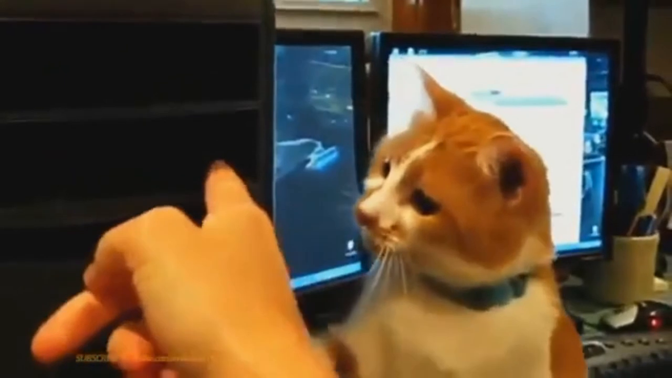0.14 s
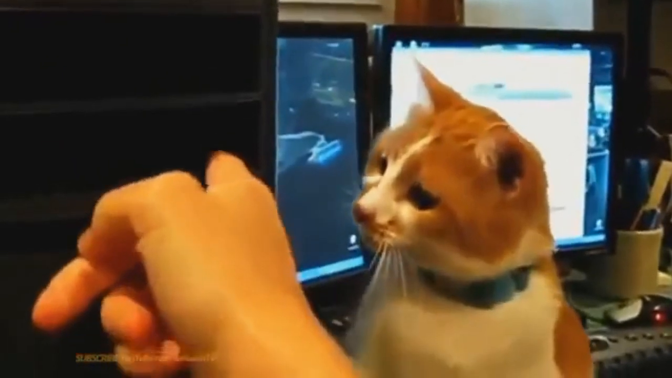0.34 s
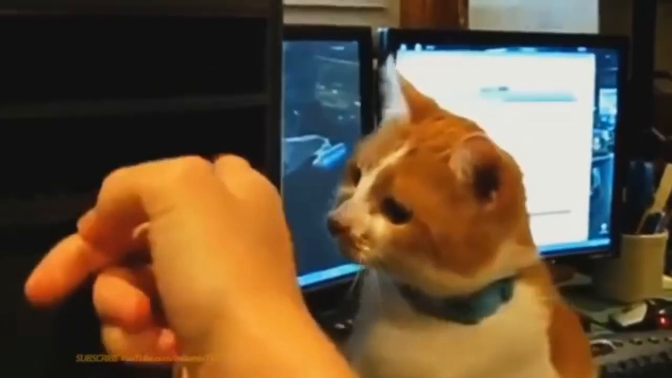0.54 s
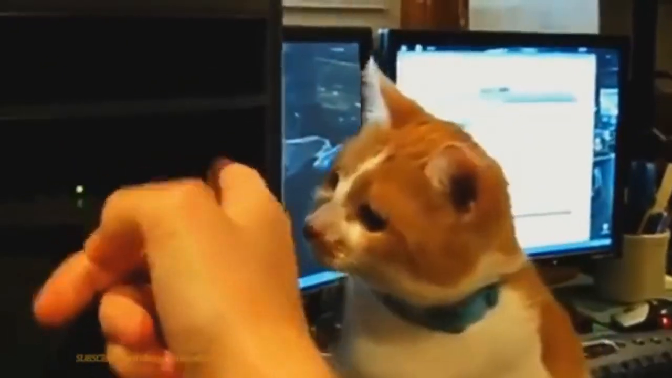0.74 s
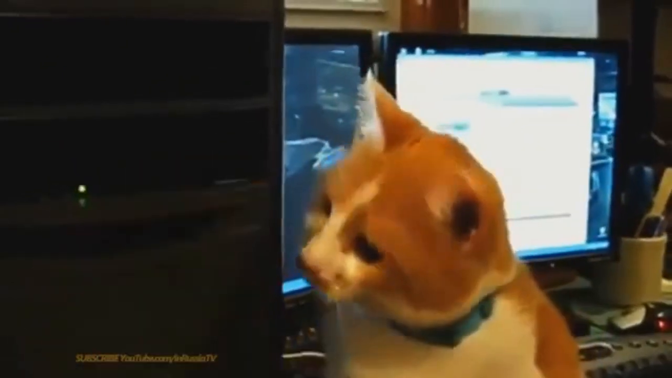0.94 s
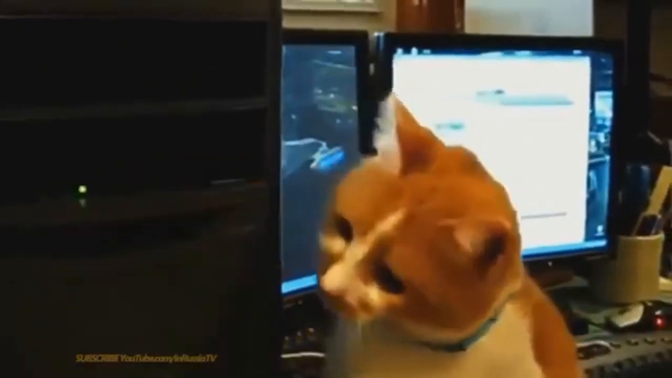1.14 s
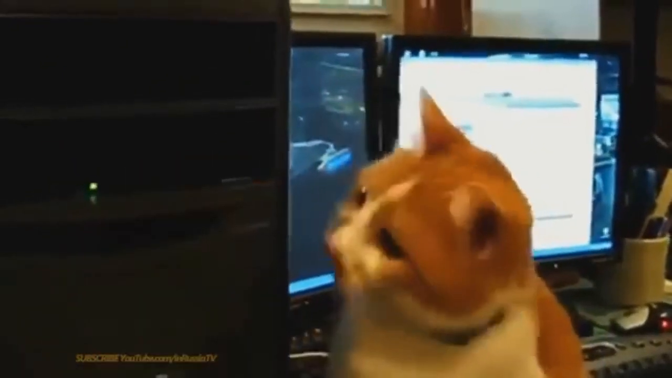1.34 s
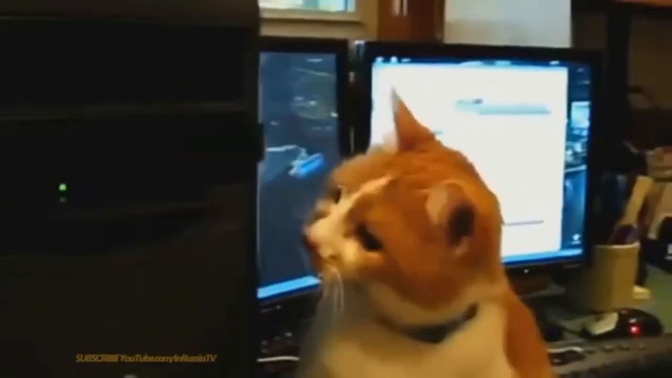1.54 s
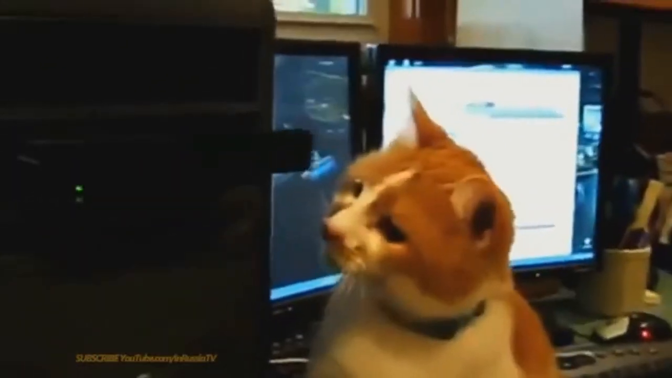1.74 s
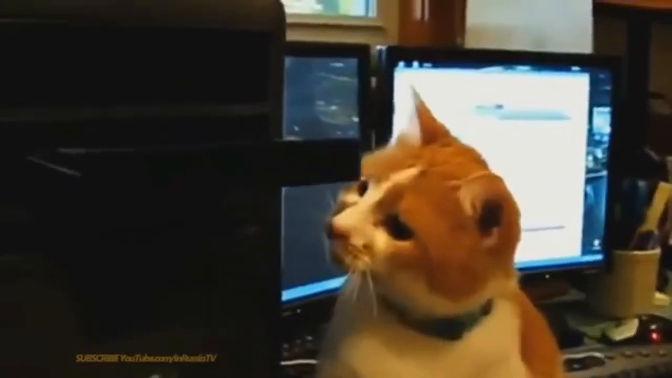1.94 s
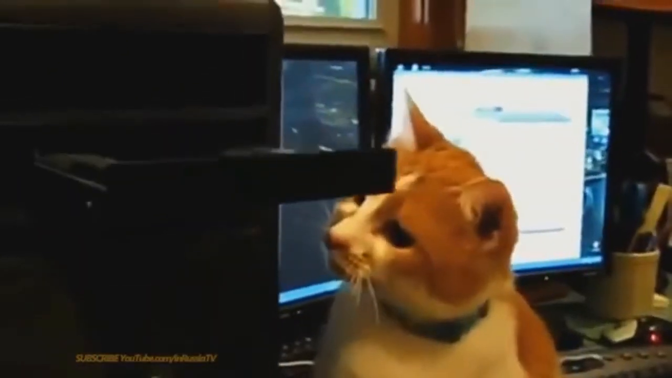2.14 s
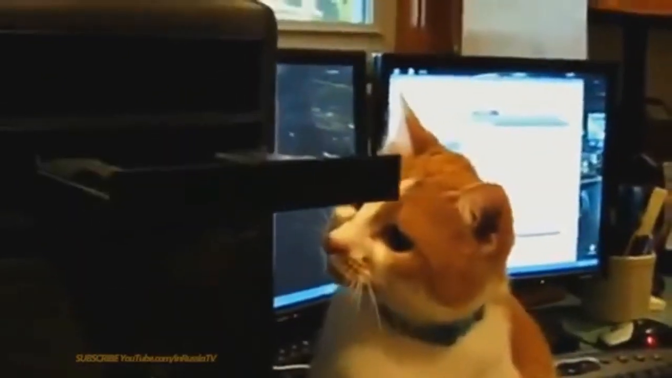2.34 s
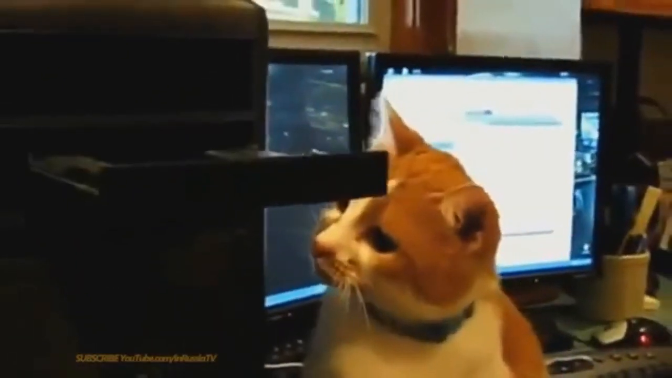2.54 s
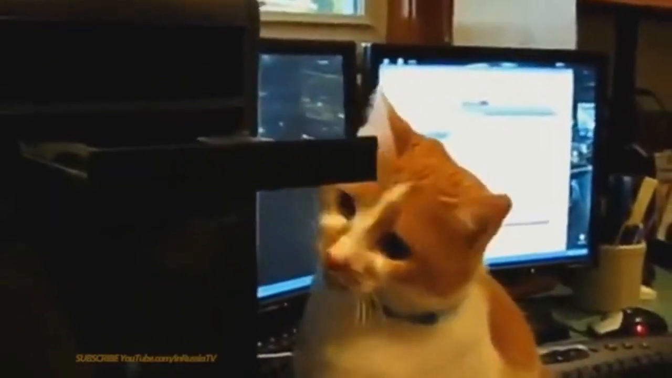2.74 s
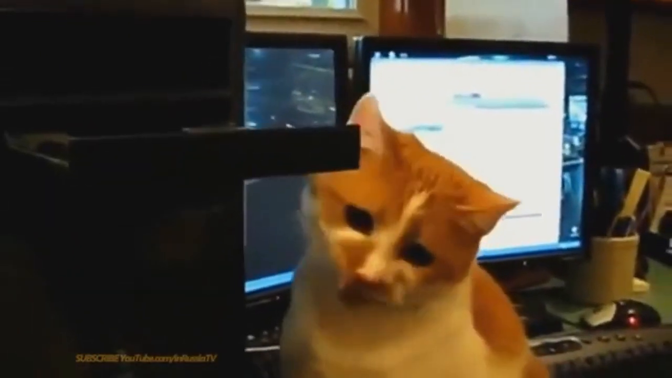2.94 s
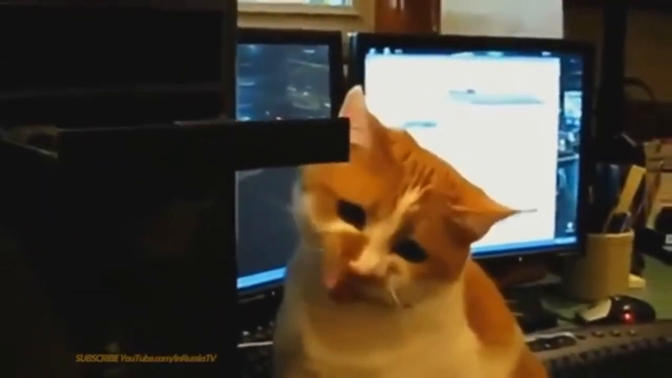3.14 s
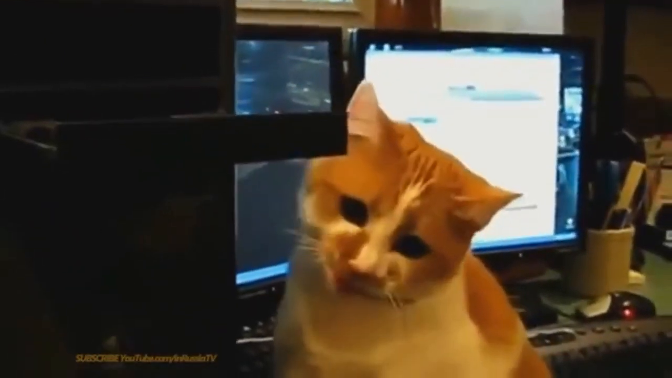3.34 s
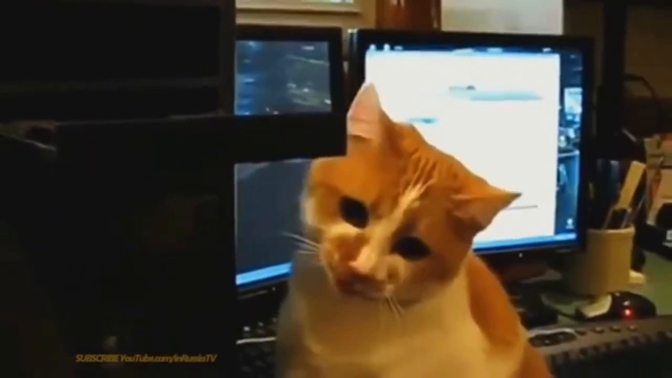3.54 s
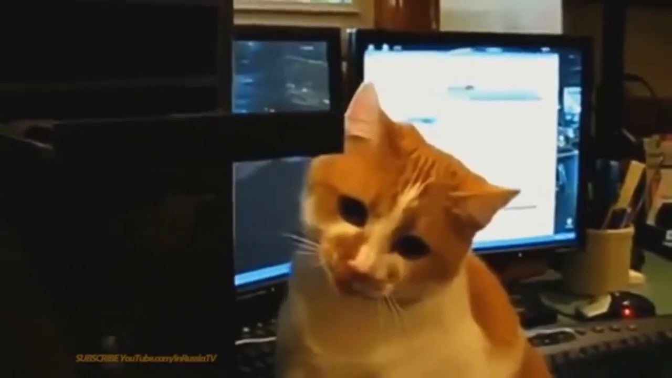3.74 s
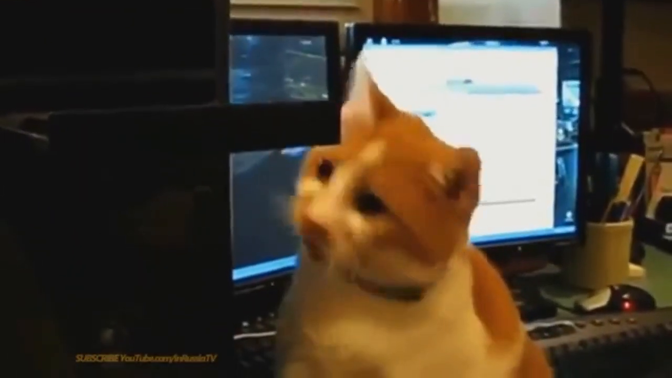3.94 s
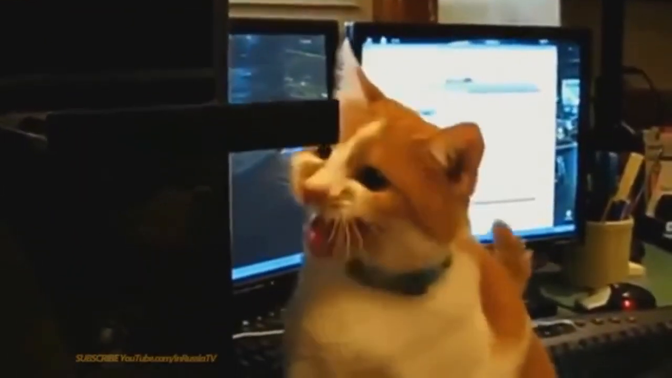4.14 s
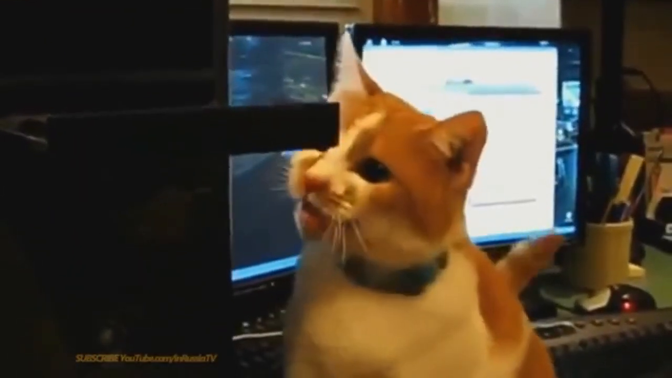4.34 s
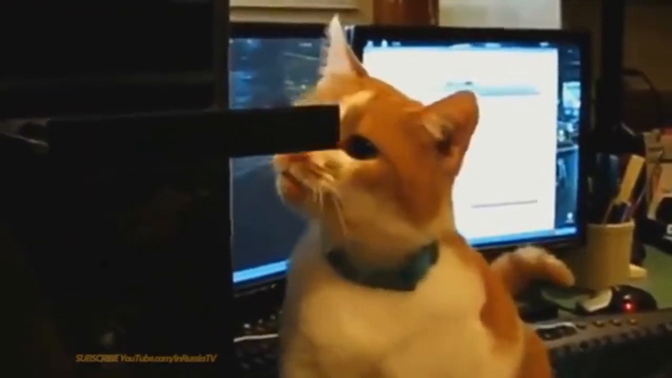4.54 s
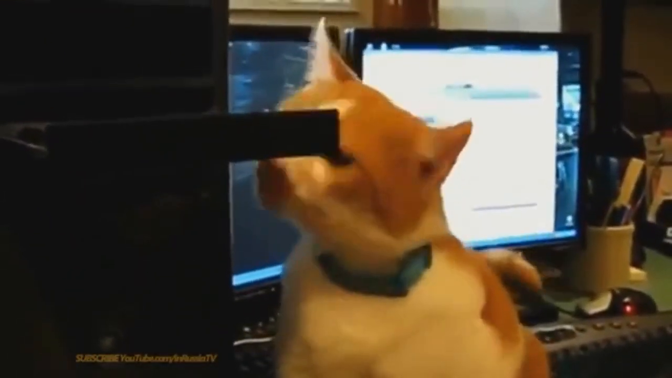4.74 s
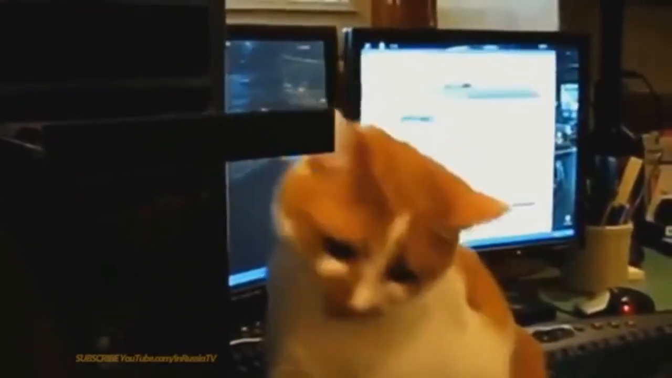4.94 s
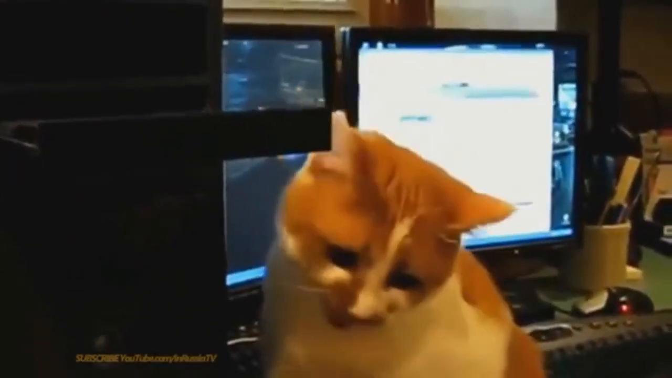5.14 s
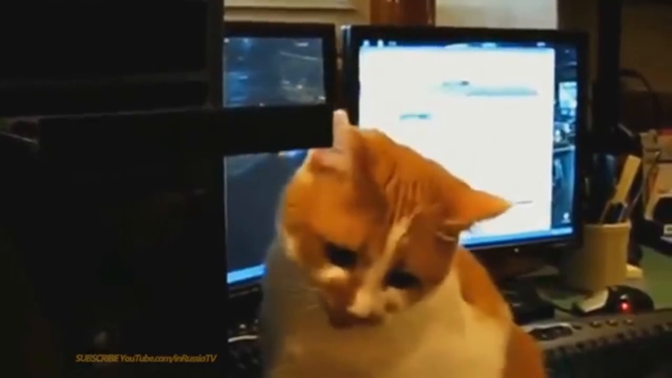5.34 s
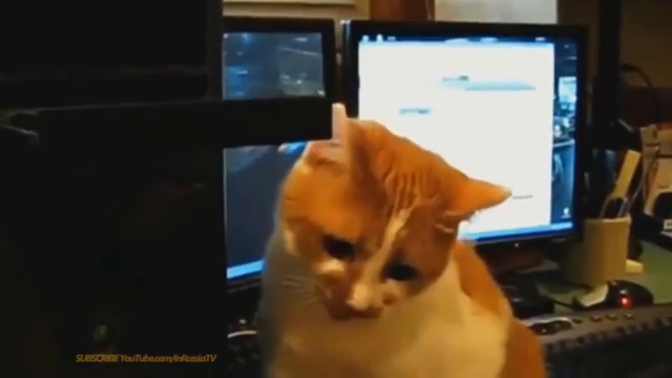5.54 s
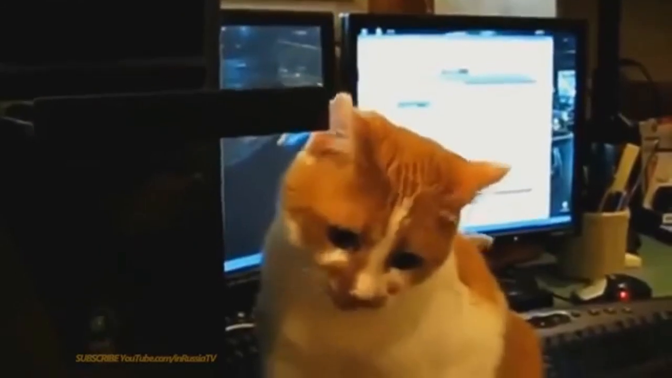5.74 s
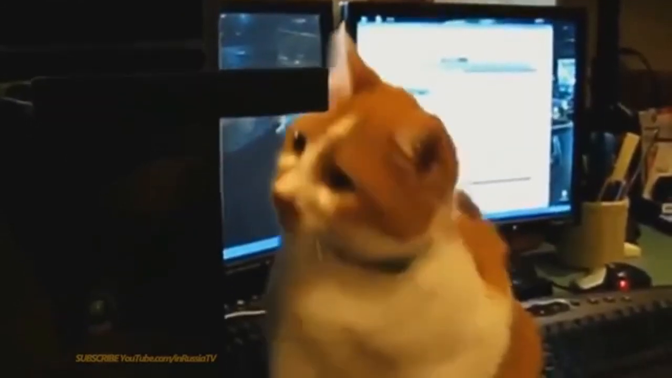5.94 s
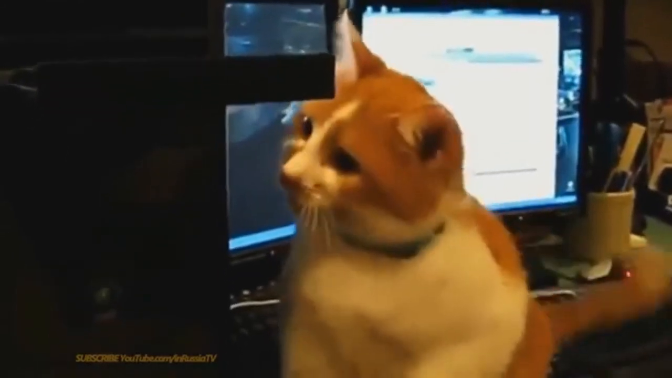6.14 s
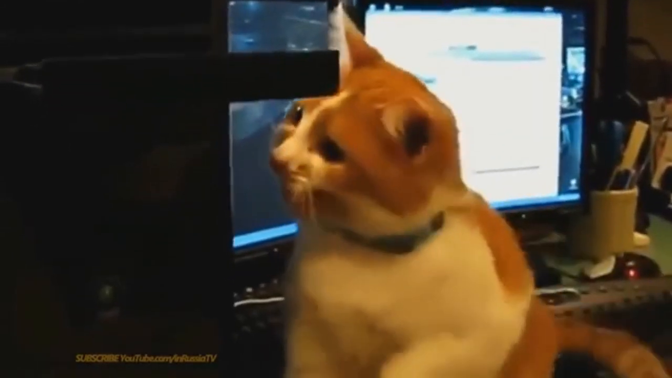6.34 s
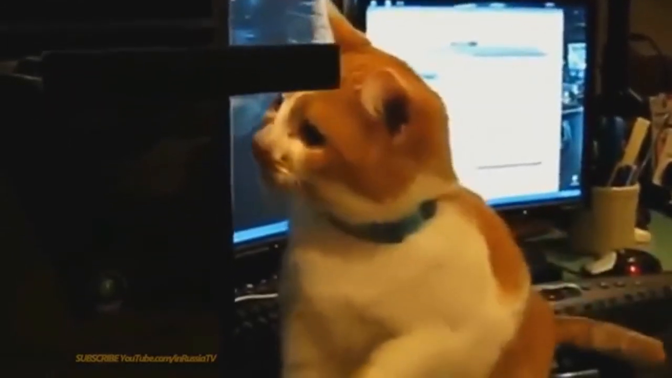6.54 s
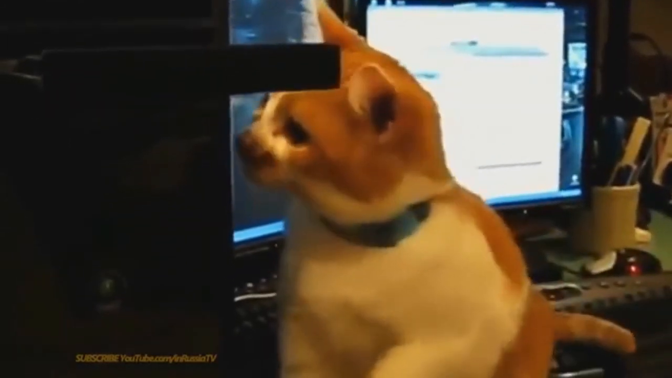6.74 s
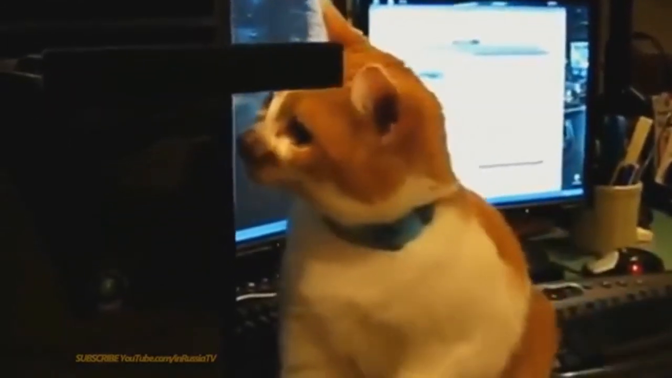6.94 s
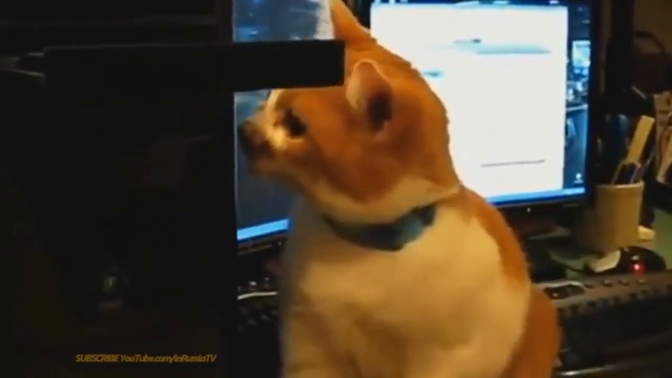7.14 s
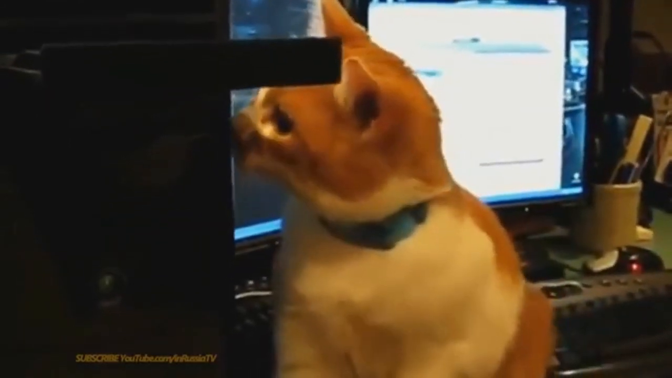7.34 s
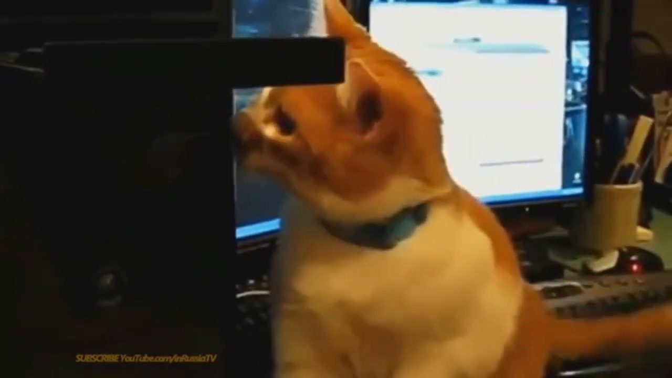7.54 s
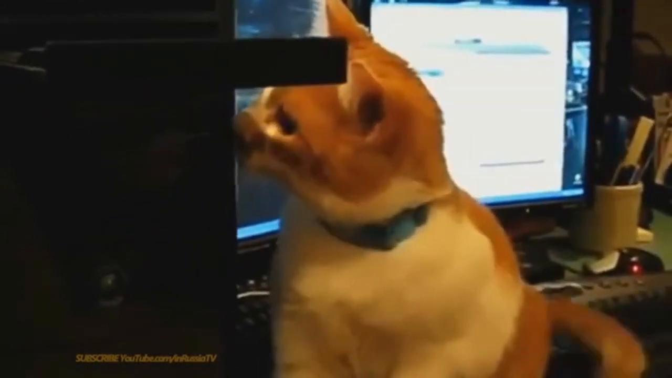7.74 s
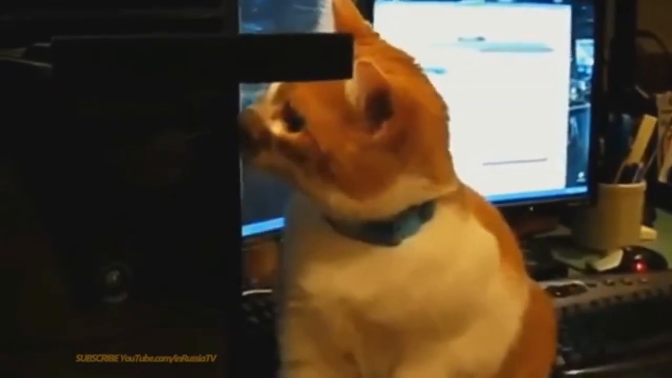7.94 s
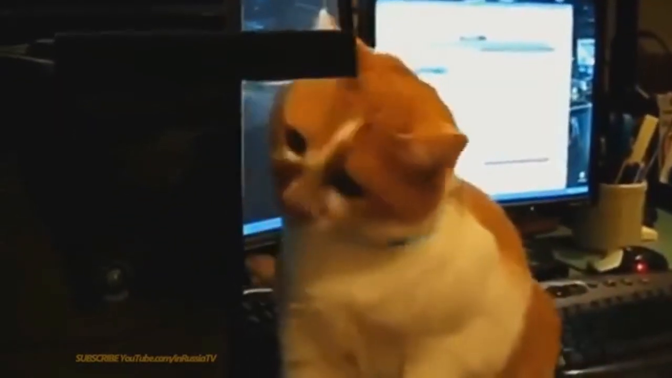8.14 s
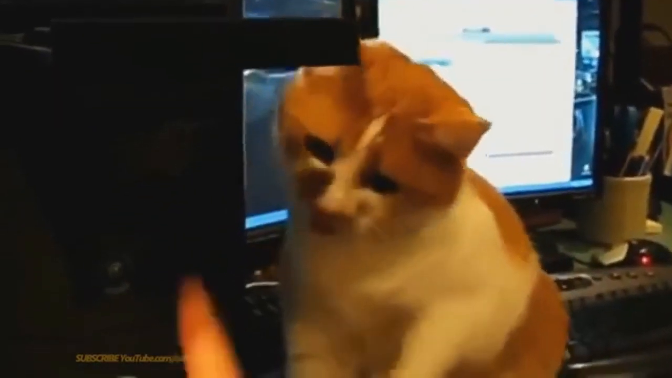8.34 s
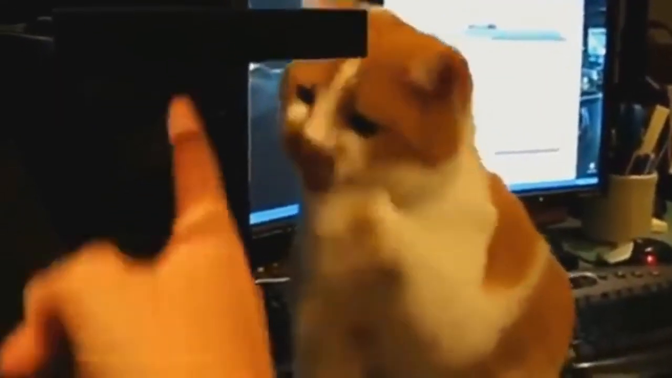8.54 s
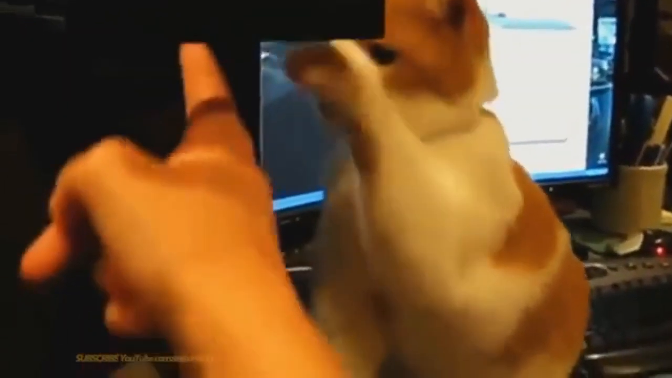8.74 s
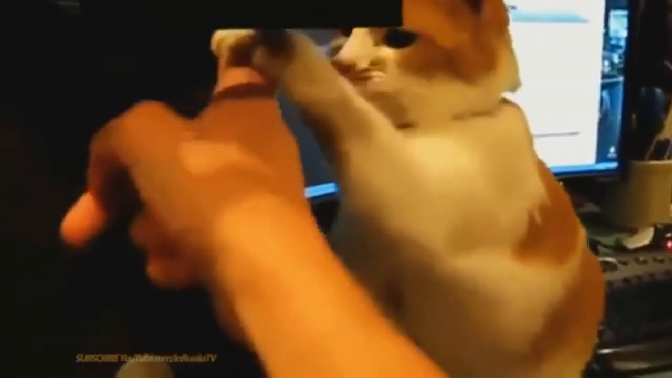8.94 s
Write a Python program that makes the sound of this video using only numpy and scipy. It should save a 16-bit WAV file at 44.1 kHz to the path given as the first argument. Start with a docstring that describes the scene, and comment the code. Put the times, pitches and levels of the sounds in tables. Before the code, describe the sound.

A desktop computer runs throughout in a small room, with a steady rush of fan air, a hum and a thin hard disk whine that swells slightly at times. Three faint, thin squeaks come right at the start. At about 0.8 seconds a small plastic button clicks down and up, followed by a few light knocks from the drive. Around 1.5 seconds the plastic disc tray clunks and rattles free, slides with a soft grainy hiss and stops with small knocks at 2.4 seconds. A cat, closer to the microphone, then gives five short, high mews at about 3.3, 4.3, 5.2, 6.5 and 8.5 seconds. Each opens with a slight hiss and a rough edge, then settles into a clear tone that sinks a little, mostly ending nasal. The third is the longest and the fourth the shortest. Tiny dry mouth ticks fall between the calls.

```python
"""A small room: a cat sits close to the microphone, beside a humming desktop computer.
After three faint squeaks a finger clicks the eject button; the plastic disc tray clunks free,
slides out rattling and stops. The cat answers with five short, high mews: a rough snap of the vocal
folds settles into a tone that sinks and turns nasal as the mouth closes. Underneath, fan air rushes
through the resonant case and the hard disk whines."""
import sys
import numpy as np
from scipy import signal
from scipy.fft import rfft, irfft, next_fast_len
from scipy.io import wavfile

SR = 44100
rng = np.random.default_rng(int(sys.argv[2]) if len(sys.argv) > 2 else 0)


def unload_wav(signal):
    """Save mono or channel-first audio to the path in sys.argv[1] as 16-bit WAV at rate SR, clipped to [-1, 1]."""
    wavfile.write(
        sys.argv[1],
        SR,
        np.round(np.clip(np.atleast_2d(signal).T, -1, 1) * 32767).astype(np.int16),
    )


N = 395577
TIME, BINS = np.arange(N) / SR, np.fft.rfftfreq(N, 1 / SR)


def cat():
    """Five mews, each led in by air hissing through the opening mouth and a snap of the folds."""
    # (start [s], length [s], mouth shuts after [s], open mouth resonance [Hz], shut resonance [Hz],
    #  low throat base level [dB], upper throat base level [dB])
    mews = [(3.304, 0.35, 0.2, 3430, 3050, -35.5, -38.5), (4.331, 0.26, 0.15, 3410, 3200, -37, -42),
            (5.245, 0.53, 0.287, 3350, 2966, -41, -44), (6.499, 0.226, .185, 3220, 2370, -49, -45),
            (8.461, .452, 0.3, 3330, 2950, -34, -44)]
    # one contour per mew: (time [s], pitch [Hz], nasal level [dB], mouth level [dB])
    contours = [
        [(3.306, 1008, -37, -21), (3.322, 974, -29, -26), (3.424, 907, -35.5, -35.5), (3.528, 899, -32.5, -48),
         (3.546, 881, -31, -48), (3.59, 856, -40, -52), (3.616, 818, -43, -70), (3.636, 807, -35.5, -55),
         (3.646, 813, -47, -64), (3.655, 801, -44, -52)],
        [(4.335, 977, -34, -22), (4.353, 948, -30.5, -26), (4.375, 937, -32.5, -18), (4.401, 922, -34, -26.5),
         (4.431, 866, -34, -28), (4.473, 863, -39.5, -29.5), (4.509, 837, -42, -41), (4.529, 845, -35.5, -43),
         (4.553, 800, -44, -51)],
        [(5.251, 938, -35, -25), (5.259, 925, -34, -20.5), (5.321, 896, -33.5, -30), (5.347, 885, -30.5, -29.5),
         (5.443, 877, -36.5, -33.5), (5.519, 885, -32, -42), (5.605, 844, -43, -47), (5.669, 863, -42, -47),
         (5.705, 825, -37.5, -49), (5.75, 813, -43, -56)],
        [(6.503, 938, -31.5, -25.5), (6.565, 877, -31.5, -24.5), (6.587, 843, -46, -28),
         (6.649, 823, -38, -29.5), (6.661, 808, -42, -31.5), (6.693, 782, -62, -32), (6.712, 755, -42, -31.5)],
        [(8.466, 936, -29, -24), (8.492, 950, -23.5, -23.5), (8.524, 913, -32, -27), (8.61, 914, -36, -29.5),
         (8.666, 928, -30.5, -36), (8.772, 944, -29.5, -34.5), (8.81, 884, -32, -52), (8.85, 900, -30.5, -52),
         (8.882, 879, -28.5, -51), (8.903, 811, -40, -43)],
    ]
    # breath swelling into each mew: (lead [s], level [dB], centre [Hz])
    breaths = [(.09, -44.5, 4100), (.11, -44, 3800), (.21, -48.5, 4000), (0.3, -56, 4800),
               (0.044, -46, 4300)]
    out = np.zeros(N)
    for shape, contour, (lead_s, air_db, air_hz) in zip(mews, contours, breaths):
        start = shape[0]
        add(out, start, mew(shape, contour))
        snap = strike(lambda hz: bell(hz, 3200, 3000), db=-34, ring_s=.0023, chatter=5)
        add(out, start + .0035, snap)
        swell = np.clip(1 + (TIME - start) / lead_s, 0, 1)
        fade = np.exp(-np.maximum(TIME - start, 0) / .072)
        hiss = noise(bell(BINS, air_hz, 2600) + amp(-4) * bell(BINS, 5600, 500))
        out += amp(air_db) * swell * fade * hiss
    return out + voice_catch() + mouth_ticks()


def mew(shape, contour, shimmer=.097, waver_db=2.5, attack_s=.0035, release_s=.022):
    """The folds start rough and settle to a clean tone that leaves by the mouth, then the nose."""
    # throat resonances, lowest first: (centre [Hz], width [Hz], gain [dB])
    throat_modes = [(4580, 1270, -4), (5940, 430, -9), (7120, 260, -19.5), (9900, 3600, -30)]
    start, length, shut_s, open_hz, shut_hz, low_throat_db, upper_throat_db = shape
    t = np.arange(0, length, 1 / SR)
    n, harmonics = len(t), np.arange(1, 14)
    times, *curves = np.transpose(contour)
    pitch, nasal_db, mouth_db = (np.interp(start + t, times, curve) for curve in curves)
    pitch = pitch * (1 + .041 * np.exp(-t / .0053))  # starts sharp and settles

    # the mouth resonance rises as the jaw opens, sinks as it closes and follows the pitch
    jaw_hz = open_hz * (1 - .1 * np.exp(-t / .02)) + (shut_hz - open_hz) * step(t, shut_s, .067)
    mouth_hz = jaw_hz * pitch / 900
    mouth = bell(harmonics[:, None] * pitch, mouth_hz, 850)
    mouth = amp(mouth_db) * mouth / np.linalg.norm(mouth, axis=0)
    # the throat partly follows the mouth and nasal levels
    low_throat = amp(low_throat_db + .73 * (mouth_db + 30))
    upper_throat = amp(upper_throat_db + .25 * (mouth_db + 30))
    effort = amp(.25 * (nasal_db + 33))
    shut = step(t, shut_s, .013)
    nasal_rolloff_db = 16 * (1 - shut) + 7 * shut  # per harmonic

    onset = np.exp(-t / .014)
    jitter = .0045 + .026 * onset
    rasp = amp(-27.5) + amp(-12) * onset
    phase = 2 * np.pi * np.cumsum(pitch * (1 + jitter * wander(n, 153))) / SR
    out = np.zeros(n)
    for k, through_mouth in zip(harmonics, mouth):
        hz = k * pitch
        nose = amp(nasal_db - nasal_rolloff_db * (k - 1))
        throat = low_throat * body(throat_modes[:1], hz) + upper_throat * body(throat_modes[1:], hz)
        level = np.sqrt(nose ** 2 + through_mouth ** 2 + (effort * throat) ** 2)
        lag = 2 * np.arctan((hz - mouth_hz) / 650)  # the mouth rings after each pulse
        # turbulence spreads a noisy skirt around the harmonics, least around the lowest
        skirt = wander(n, 1200) * np.cos(k * phase) + wander(n, 1200) * np.sin(k * phase)
        waver = amp(waver_db * min((k - 1) / 4, 1) * wander(n, 21))
        out += waver * level * (np.cos(k * phase - lag) + rasp * min(k / 3, 1) * skirt)
    gate = np.clip(np.minimum(t / attack_s, (length - t) / release_s), 0, 1)
    return np.sqrt(2) * out * gate * (1 + shimmer * wander(n, 140))


def voice_catch():
    """A brief raspy catch in the first mew: a puff of narrow-band noise."""
    # the puff: (time [s], width [s], centre [Hz], width [Hz], level [dB])
    puff = (3.381, .017, 2800, 350, -37)
    s, width_s, centre_hz, width_hz, db = puff
    return amp(db) * bell(TIME, s, width_s) * noise(bell(BINS, centre_hz, width_hz))


def mouth_ticks():
    """Small dry ticks as the cat shifts and opens its mouth."""
    # (time [s], level [dB], centre [Hz], ring [s])
    ticks = [(3.0595, -43.5, 5260, .003), (3.115, -51, 5500, .002), (4.131, -52, 6000, .002),
             (5.037, -46, 5400, 0.0022), (7.989, -49, 7000, .003), (8.31, -42, 6160, 0.0018),
             (8.3395, -38.5, 9800, .0007), (8.3585, -50, 13000, .0007)]
    out = np.zeros(N)
    for s, db, centre_hz, ring_s in ticks:
        add(out, s, strike(lambda hz: bell(hz, centre_hz, 3100), db, ring_s, chatter=2.5))
    return out


def eject_button():
    """A small plastic button clicks as it is pressed and again as it is let go."""
    # (time [s], level [dB], tilt [dB/octave], ring [s], favoured frequency [Hz])
    clicks = [(.7852, -21, 1, 0.0016, 6100), (.8897, -25, -3, 0.00093, 2580)]
    # button resonances: (centre [Hz], width [Hz], gain [dB])
    modes = [(700, 790, -1), (2720, 860, 4.5), (3370, 600, -4), (4670, 750, -7), (6000, 720, -5.5),
             (7230, 560, -2), (9500, 1200, -14.5), (12600, 4000, -7)]
    return plastic(clicks, modes, chatter=2.8, favour_db=8.5)


def tray_knocks():
    """The drive and its tray clunk, and the loose tray rattles between the knocks."""
    # (time [s], level [dB], tilt [dB/octave], ring [s], favoured frequency [Hz])
    knocks = [(.944, -31.5, -6, .012, 1700), (1.0, -37, 6, .008, 3300), (1.022, -33.5, -0.5, 0.0036, 2900),
              (1.0595, -31, -8.5, 0.0022, 1800), (1.4375, -28.5, 0.5, .0045, 4630),
              (1.452, -27.5, 6.5, 0.0058, 2200), (1.458, -25, -2.5, .0062, 1200),
              (1.463, -25, -2, 0.0029, 1000), (1.4742, -21, 1.5, 0.0049, 3800),
              (1.482, -33, -1, .0055, 3800), (1.5625, -26.5, 2, .008, 9800), (1.582, -22, 1, .0067, 2010),
              (2.352, -32.5, 1, .01, 2500), (2.411, -37, 0, .0044, 1800)]
    # (start [s], length [s], average tap level [dB])
    rattles = [(.95, 0.038, -45), (1.492, 0.062, -32), (1.557, .024, -37.5), (2.329, 0.047, -45)]
    # tray resonances: (centre [Hz], width [Hz], gain [dB])
    modes = [(360, 450, -2), (840, 210, -12), (1060, 420, 4), (1800, 250, 0), (2530, 810, -3.5),
             (3800, 680, -6), (4770, 1100, -11), (6100, 2000, -18), (9800, 2600, -24), (12600, 3000, -27)]
    taps = [tap for run in rattles for tap in rattle(*run)]
    return plastic(knocks + taps, modes, chatter=10, favour_db=6)


def rattle(start, length, db, count=5, spread_db=5.5, ring_s=.007):
    """A run of light taps, uneven in spacing, strength and colour."""
    for k, (late, force, place) in enumerate(rng.uniform(-1, 1, (count, 3))):
        s = start + length * (k + late / 4) / count
        yield s, db + spread_db * force, 0, ring_s, 2500 * 2 ** (place / 2)


def tray_slide(start_s=1.38, stop_s=2.43, ramp_s=.035, db=-47.5):
    """The tray runs along its rails at an even speed with a grainy hiss."""
    # friction spectrum: (frequency [Hz], relative level [dB])
    rails = [(100, -7), (500, -6), (2000, 4.5), (4500, -6), (7000, -12), (10000, -19), (12500, -9.5),
             (15000, -19)]
    moving = np.clip(np.minimum(TIME - start_s, stop_s - TIME) / ramp_s, 0, 1)
    hiss = noise(amp(read(rails, BINS)))
    grain = unit(amp(1.9 * noise(bell(BINS, 0, 150))))
    return amp(db) * moving * hiss * grain


def plastic(blows, modes, chatter, favour_db):
    """Blows on one plastic part; each point of contact favours some of its modes."""
    out = np.zeros(N)
    for s, db, tilt_db, ring_s, favoured_hz in blows:
        def colour(hz):
            octaves = np.log2((hz + 500) / 3000)
            return body(modes, hz) * amp(tilt_db * octaves + favour_db * bell(hz, favoured_hz, 770))
        add(out, s, strike(colour, db, ring_s, chatter))
    return out


def strike(colour, db, ring_s, chatter, size=4096):
    """A sharp contact and a dying chatter ring a minimum-phase filter; db is the level over 5 ms."""
    t, hz = np.arange(size) / SR, abs(np.fft.fftfreq(size, 1 / SR))
    contact = unit(1. * (t == 0)) + chatter * unit(rng.standard_normal(size) * np.exp(-t / ring_s))
    radiated = hz ** 2 / (hz ** 2 + 300 ** 2)  # small parts radiate little bass
    log_gain = np.log(colour(hz) * radiated + 1e-4)
    response = np.exp(np.conj(signal.hilbert(log_gain)))[:size // 2 + 1]
    return amp(db) * unit(irfft(rfft(contact) * response)) * np.sqrt(.005 * SR / size)


def squeaks(bend=.039, waver=.0072):
    """Thin, wavering tones that rise and fall in pitch and level together."""
    # (start [s], length [s], top pitch [Hz], level [dB])
    chirps = [(0, 0.07, 1640, -45.5), (.095, 0.062, 1625, -47), (0.16, .065, 1665, -43)]
    out = np.zeros(N)
    for s, length, top_hz, db in chirps:
        arch = np.sin(np.pi * np.arange(0, length, 1 / SR) / length)
        hz = top_hz * (1 - bend * (1 - arch) + waver * wander(len(arch), 150))
        add(out, s, amp(db) * arch * tone(hz))
    return out


def fan_rush(level_db=-40.5):
    """Air rushes through the computer and excites the resonances of its case."""
    # fan and drive noise: (frequency [Hz], relative level [dB])
    spectrum = [(18, -53), (30, -22.5), (136, -13), (247, -2.5), (296, -9), (328, -8.5), (597, -8),
                (794, -1), (859, -6.5), (928, -3.5), (2190, -13), (3320, -14.5), (7830, -31.5),
                (8470, -29.5), (15000, -33)]
    # case resonances: (centre [Hz], width [Hz], boost [dB])
    case_modes = [(169, 15, 6), (262.7, 47, 9.5), (338, 37, 5.5), (510, 28, 4.5), (552, 19.6, 9),
                  (645, 48, 4.5), (950, 45, 0.5), (1800, 100, 2), (3300, 220, -1)]
    case_db = sum(db * bell(BINS, centre, width) for centre, width, db in case_modes)
    return amp(level_db) * noise(amp(read(spectrum, BINS) + case_db))


def computer_hum(fan_turn_hz=102.3, whine_hz=3210, waver=.28, speed_drift=.001018, points=4096):
    """Fans and discs sing tones that waver with their speed; the hard disk's whine swells at times."""
    # fan harmonics: (multiple of the turning rate)
    orders = [4, 7, 8, 9, 10, 12, 14, 16, 18]
    # strength of each fan harmonic: (level [dB])
    order_levels = [-61.5, -52.5, -49, -57.5, -59, -62.5, -61, -62, -61.5]
    # other steady fan and disc tones: (frequency [Hz], level [dB])
    steady_tones = [(82, -79), (246, -61), (264, -66), (333.8, -59.5), (489.8, -60), (953, -60.5),
                    (3278, -66.5), (3348, -67.5), (3865, -65.5), (4603, -64.5), (8527, -70.5),
                    (9254, -74.5), (9771, -84)]
    # swells of the whine: (time [s], width [s], rise [dB])
    whine_swells = [(.6, 0.55, 8.5), (2.2, 0.79, 5), (8.25, 1.5, 8)]
    fan_tones = [(k * fan_turn_hz, db) for k, db in zip(orders, order_levels)]
    whine_db = -61.5 + sum(db * bell(TIME, s, width) for s, width, db in whine_swells)
    slow_time = np.linspace(0, TIME[-1], points)  # stretches a short wander over the whole scene
    out = np.zeros(N)
    for hz, db in fan_tones + steady_tones + [(whine_hz, whine_db)]:
        swell, drift = (np.interp(TIME, slow_time, wander(points, 520)) for _ in range(2))
        out += amp(db) * (1 + waver * swell) * tone(hz * (1 + speed_drift * drift))
    return out


def room(x, early_db, tail_db, early_s=.0062):
    """Quick reflections from desk, case and screens, then a short tail that darkens."""
    # reverb decay: (frequency [Hz], time to fall 60 dB [s])
    decay = [(200, 0.41), (1000, 0.24), (4000, 0.21), (12000, 0.13)]
    t = np.arange(SR // 2) / SR
    taps = rng.choice([-1., 1.], len(t)) * (rng.random(len(t)) < 2000 / SR) * (t > .0015)
    hz, s, bands = signal.stft(taps * (t > .008), SR, nperseg=256)
    bands = bands * amp(-60 * s / read(decay, hz)[:, None])
    tail = signal.istft(bands, SR, nperseg=256)[1][:len(t)]
    echo = amp(early_db) * unit(taps * np.exp(-t / early_s)) + amp(tail_db) * unit(tail)
    return x + signal.fftconvolve(x, echo / np.sqrt(len(t)))[:N]


def amp(db):
    """Decibels to gain."""
    return 10 ** (np.asarray(db) / 20)


def unit(x):
    """Scales to rms 1."""
    return x / np.sqrt(np.mean(x ** 2) + 1e-20)


def read(points, hz):
    """Reads a table on a log-frequency axis."""
    f, value = np.transpose(points)
    return np.interp(np.log(hz + 1), np.log(f + 1), value)


def add(mix, s, sound):
    """Mixes a sound in at time s."""
    part = mix[max(round(s * SR), 0):][:len(sound)]
    part += sound[:len(part)]


def step(t, at_s, width_s):
    """A smooth step from 0 to 1."""
    return .5 + .5 * np.tanh((t - at_s) / width_s)


def bell(x, centre, width):
    """A steep peak, 12 dB down at one width from its centre."""
    return 1 / (1 + ((x - centre) / width) ** 2) ** 2


def body(modes, hz):
    """Gain of a set of resonances."""
    return sum(amp(db) * bell(hz, centre, width) for centre, width, db in modes)


def tone(hz):
    """A sine of rms 1 that follows a pitch curve."""
    return np.sqrt(2) * np.sin(2 * np.pi * np.cumsum(hz) / SR)


def wander(n, rate_hz):
    """Smooth random motion of rms 1."""
    size = next_fast_len(n, True)
    lowpass = bell(np.fft.rfftfreq(size, 1 / SR), 0, rate_hz)
    return unit(irfft(rfft(rng.standard_normal(size)) * lowpass, size)[:n])


def noise(gain):
    """Steady noise of rms 1 with the given spectrum."""
    size = next_fast_len(N, True)
    colour = np.interp(np.fft.rfftfreq(size, 1 / SR), BINS, gain)
    return unit(irfft(rfft(rng.standard_normal(size)) * colour, size)[:N])


def scene():
    """The cat close by and the drive farther into the room, over the computer's hum."""
    near = room(cat(), early_db=-19, tail_db=-17)
    drive = tray_slide() + eject_button() + tray_knocks()
    far = room(drive + squeaks(), early_db=-11.5, tail_db=-15)
    return (near + far + fan_rush() + computer_hum())[None]


def record(dry, ceiling=.34, notch_hz=7900, notch_db=-20, cutoff_hz=15100):
    """The microphone rounds off the sharpest peaks, dips narrowly in the treble and loses the top."""
    rounded = dry / (1 + (dry / ceiling) ** 8) ** (1 / 8)
    hz = np.linspace(0, SR / 2, 1025)
    notch = signal.firwin2(511, hz, amp(notch_db * bell(hz, notch_hz, 380)), fs=SR)
    lowpass = signal.firwin(511, cutoff_hz, window=("kaiser", 9), fs=SR)
    return signal.oaconvolve(rounded, np.convolve(notch, lowpass)[None], "same")


dry = scene()
out = record(dry)
unload_wav(out)
```